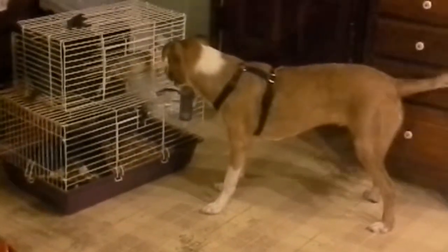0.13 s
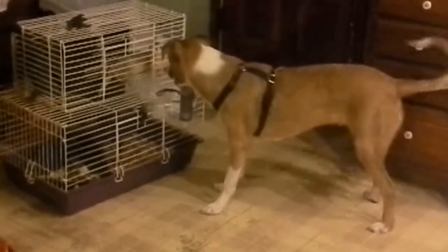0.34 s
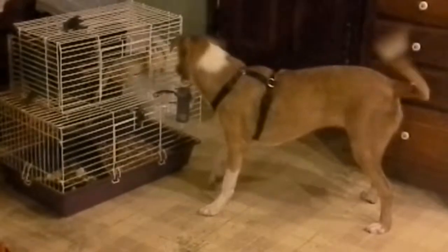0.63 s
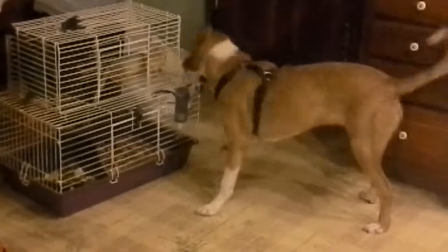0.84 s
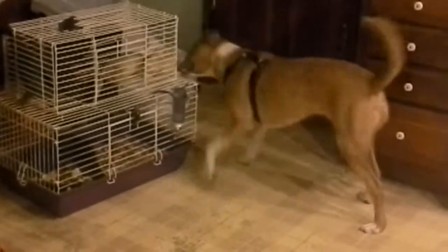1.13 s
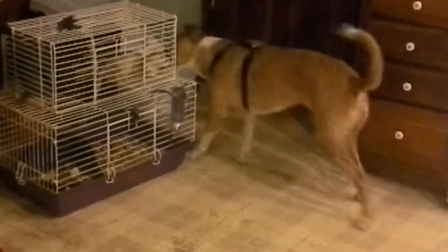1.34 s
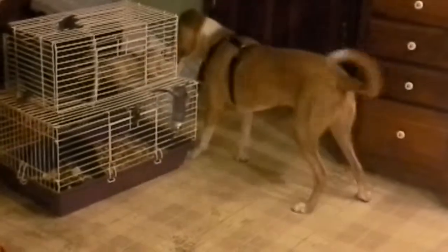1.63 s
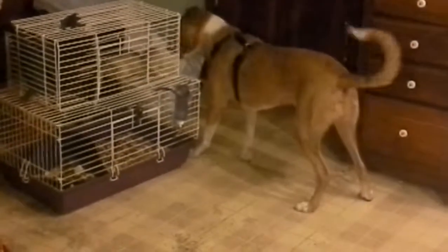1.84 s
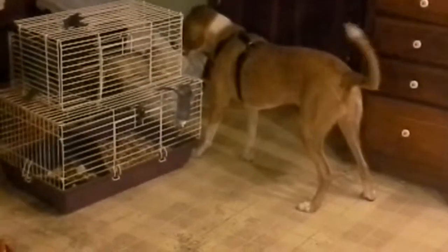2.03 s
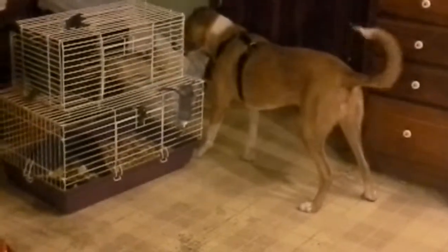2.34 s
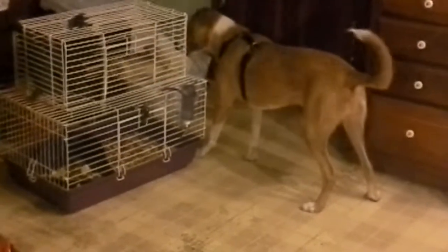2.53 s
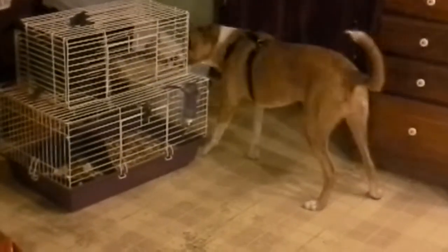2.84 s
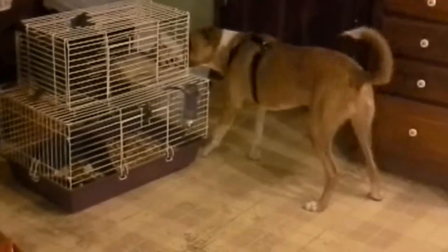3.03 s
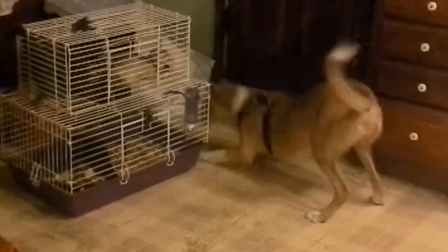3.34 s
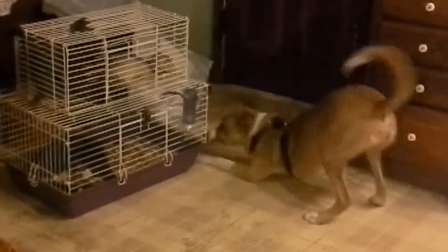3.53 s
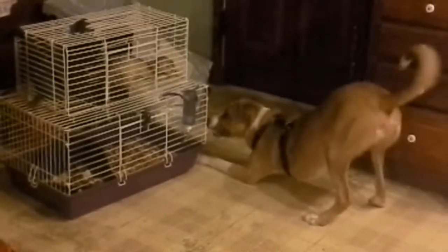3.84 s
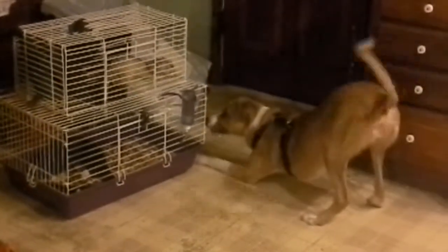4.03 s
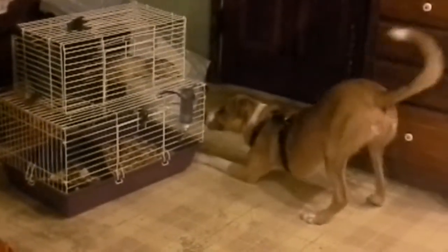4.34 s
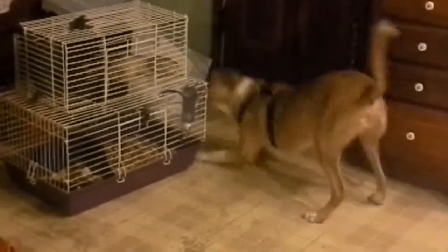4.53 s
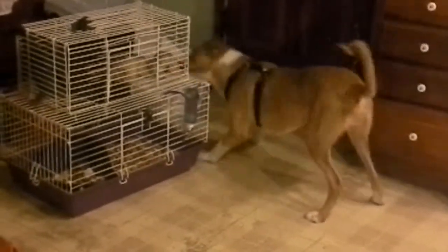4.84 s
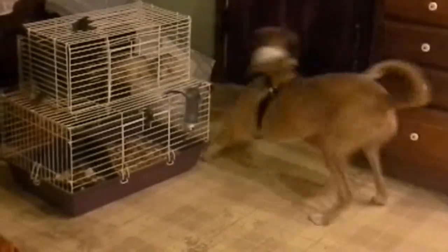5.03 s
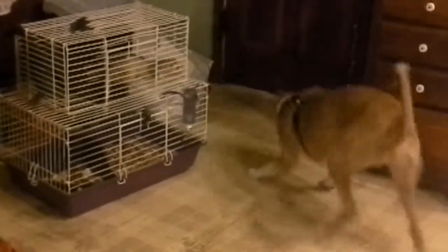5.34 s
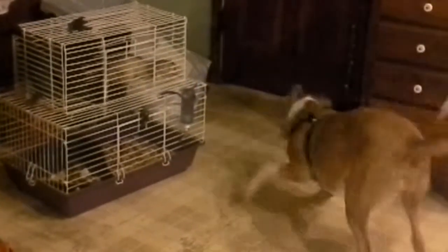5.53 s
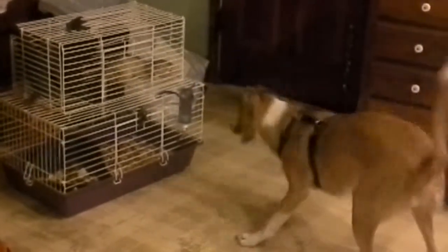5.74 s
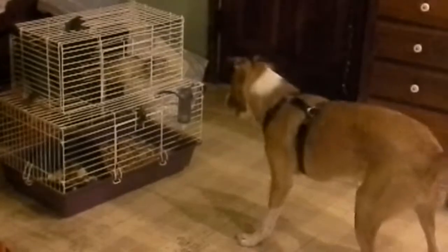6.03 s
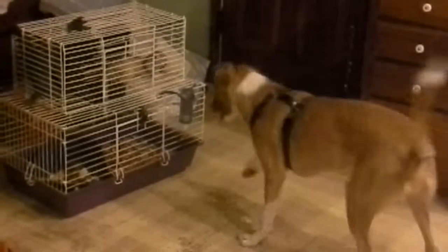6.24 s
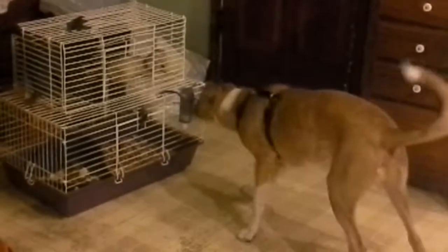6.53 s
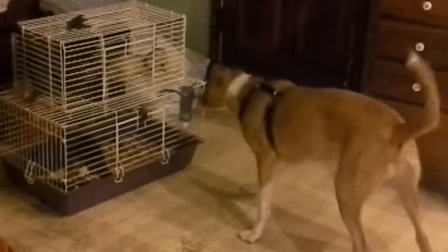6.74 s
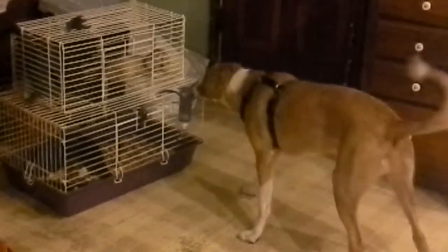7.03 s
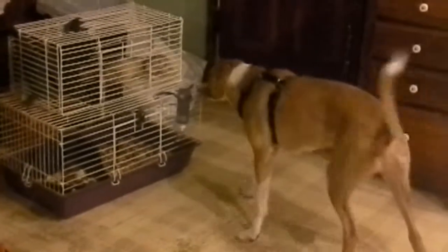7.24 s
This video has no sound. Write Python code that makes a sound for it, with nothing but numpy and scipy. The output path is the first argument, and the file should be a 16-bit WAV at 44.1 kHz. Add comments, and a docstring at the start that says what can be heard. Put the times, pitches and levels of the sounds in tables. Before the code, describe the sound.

A soft steady fan and a very faint mains hum lie under everything in a small, hard-floored, brightly echoing room, heard from nearby. A barely audible paw tap comes at 0.5 seconds. From about 0.95 to 1.6, claws scrape briefly with a thin squeak, paws pad lightly, and the wire cage gives several small dry clinks. It falls quiet, with slight rubbing and a tiny buckle tinkle near 3. At 3.4 to 3.6 the dog's front paws land in a deep double thump, with a sharp metallic clank and soft scuffing. Another lull holds only faint brushing. Between 5.1 and 5.7 comes the loudest cluster: quick hard thumps and bright wire clatter, strongest at 5.3, bars ringing briefly. A claw drags softly at 5.85. A single clink with a muffled thump sounds at 6.45, then light rustling and tiny tinkles around 6.7 before the fan alone remains.

```python
"""A dog pounces and jumps beside a wire pet cage in a small, hard-floored room.
Clusters of noise cracks excite bar resonances for the clinks and chatter, with pings and dry clicks on top.
Paws thump as damped board modes with a deep push; shaped noise makes their scuffs and claw drags.
Wall echoes and decaying noise answer brightly, and a buckle tinkles faintly through resonant peaks.
Behind it, coloured noise makes a soft fan and wavering sines make a mains hum."""
import sys
import numpy as np
from scipy import signal
from scipy.fft import rfft, irfft, next_fast_len
from scipy.io import wavfile
from scipy.ndimage import map_coordinates

SR = 44100
rng = np.random.default_rng(int(sys.argv[2]) if len(sys.argv) > 2 else 0)


def generate_wav(signal):
    """Clip the signal to [-1, 1] and save it as 16-bit WAV at the path in sys.argv[1]."""
    frames = np.transpose(np.atleast_2d(signal))
    scaled = np.clip(frames, -1, 1) * 32767
    pcm = np.round(scaled).astype(np.int16)
    wavfile.write(sys.argv[1], SR, pcm)


N = 326340  # length [samples]
T = np.arange(int(.7 * SR)) / SR  # time axis of one hit [s]

# fan noise colour: (frequency [Hz], relative level [dB per Hz])
FAN_COLOUR = [(25, -27), (50, -6), (90, -9.5), (180, -5.5), (450, -3.5), (680, -8), (820, -5), (915, 0.5),
              (1040, -5.5), (1270, -6), (1550, -13), (2300, -12), (3200, -16), (7500, -20), (14500, -23)]
# fan's place in stereo: (frequency [Hz], left over right [dB])
FAN_LEAN = [(380, 5.5), (700, -7.5), (1300, -7), (2400, 1), (4400, 4), (8000, 0)]
# mains hum partials: (frequency [Hz], level [dB rms])
HUM_PARTIALS = [(60, -76), (120, -77.5), (180, -72), (240, -75), (299, -72), (360, -75.5)]
# paws landing: (time [s], relative level [dB], centre [Hz], deep push over knock [dB])
THUMPS = [(0.463, -54, 376, -21), (1.087, -35.5, 350, -7), (1.11, -38.5, 372, -24),
          (1.272, -48.5, 540, -24), (1.436, -41.5, 282, -20), (3.384, -23, 318, -11.5),
          (3.474, -32.5, 294, -9.5), (3.541, -22, 270, -13), (3.557, -32, 258, -21), (3.622, -43, 262, -25),
          (5.135, -48, 226, -18.5), (5.32, -20, 266, -46.5), (5.335, -16, 350, -28.5),
          (5.417, -30, 365, -22.5), (5.525, -30.5, 263, -31), (5.541, -26, 255, -34),
          (5.711, -29, 238, -28), (6.453, -43, 312, 1.5)]
# floor board modes: (frequency [Hz], relative level [dB], t60 [s])
BOARDS = [(140.5, -1, 0.17), (171.3, 2, 0.16), (231.4, 4, 0.15), (259.6, -1, 0.27), (316, 3, 0.2),
          (361, -5, 0.15), (382.5, -5.5, 0.26), (413, -3.5, 0.12), (452, -3, 0.1)]
# the whole floor flexing: (frequency [Hz], relative level [dB per Hz])
FLOOR_PUSH = [(40, -17.5), (78, -7), (120, -13), (300, -82)]
# strokes of paws and fur on floor and bars: (start [s], swell [s], level [dB], hiss over body [dB])
RUBS = [(.945, 0.077, -53, -4.5), (1.136, 0.069, -48, -1), (2.725, 0.047, -57.5, -11), (2.9, 0.082, -62, 1),
        (3.197, 0.07, -53.5, 3), (3.5, 0.13, -51, -1), (4.48, 0.1, -67, -1), (4.69, .11, -58, 2.5),
        (4.9, 0.2, -51, 2), (5.19, 0.08, -57.5, -5), (5.8, 0.09, -54, -1.5), (6.57, 0.18, -53.5, -0.5)]
# fine hiss of a stroke: (frequency [Hz], relative level [dB per Hz])
RUB_HISS = [(1500, -28.5), (3000, -10), (4800, -12), (6200, -10.5), (7700, -4), (9000, -9), (14500, -19)]
# hollow body of a stroke: (frequency [Hz], relative level [dB per Hz])
RUB_BODY = [(100, -1), (280, 2.5), (470, 6.5), (700, -4), (1250, -1.5), (1800, -6.5), (2500, -3),
            (3600, -15.5), (8000, -37)]
# claws dragging over the floor: (start [s], length [s], level [dB], squeak over scrape [dB])
DRAGS = [(0.951, 0.12, -48.5, -11.5), (1.164, 0.078, -44.5, -6), (5.846, 0.13, -47, -16)]
# scrape resonances: (frequency [Hz], width [Hz], relative level [dB])
CLAW_PEAKS = [(1100, 170, -1.5), (1320, 530, -4), (2200, 200, -4), (2650, 160, -2), (2400, 4100, -14.5)]
# squeak resonance: (frequency [Hz], width [Hz], relative level [dB])
SQUEAK_PEAKS = [(6700, 570, -2)]
# bumps on the wires: (time [s], relative level [dB], relative bar ring [dB], ring centre [Hz],
# brightness [dB per octave], chatter time [s])
CLINKS = [(1.084, -40, -5, 2360, -9.5, 0.0046), (1.0952, -24, -3.5, 2390, 1.5, 0.011),
          (1.215, -38, -0.5, 2300, -5.5, 0.027), (1.438, -24, 2, 2460, 1, 0.003),
          (1.6174, -32, -5.5, 2690, -2, 0.0025), (3.3816, -18, 1, 1980, 1, 0.0038),
          (3.476, -32.5, 3.5, 1870, -4, 0.0047), (4.496, -61.5, 7, 2500, -5, 0.0041),
          (5.146, -38.5, 1, 2470, 0, 0.0012), (5.255, -46, 3, 2380, -22.5, 0.012),
          (5.3168, -14, 3, 2560, -1.4, 0.0095), (5.412, -21.5, -3, 2710, 0, 0.0022),
          (5.5254, -30, -20.5, 2600, -7.5, 0.00077), (5.5321, -19, 0, 2530, 2, .0055),
          (5.7036, -19.7, 3, 2480, -0.5, 0.0037), (6.4526, -22.5, 0, 2670, 0.5, 0.0044)]
# cage bar resonances: (frequency [Hz], width [Hz], relative level [dB])
BARS = [(1910, 59, -6.5), (2213, 68, 2), (2376, 37, 0), (2546, 53, -0.5), (2650, 90, 1.5),
        (2960, 1300, -2.5), (3475, 60, -6.5), (8000, 400, -14)]
# thin modes of the cage frame: frequency [Hz]
FRAME_MODES = [4080, 4880, 5970, 6730, 7120, 8200, 8360, 9100, 11100]
# crack of wire on wire: (frequency [Hz], relative level [dB per Hz])
CRACK_COLOUR = [(80, -72), (220, -8), (750, -11.5), (1300, -7.5), (1900, -1.5), (2800, -0.5), (3700, -1.5),
                (5400, -1), (6800, 3.5), (8200, 4.5), (10200, -1.5), (14500, -6)]
# dry clicks within the clatter, some at a bump, some as sharp echoes just after:
# (time [s], relative level [dB], pitch [Hz])
CLICKS = [(1.11, -5.5, 9000), (1.4393, -23, 2460), (1.4532, -8, 7550), (1.622, -27, 2800),
          (1.639, -14, 7500), (3.399, -26, 2100), (5.5262, -7.5, 7600), (5.532, -14, 2860),
          (5.547, -4, 7600), (5.7087, -19, 2570), (6.4523, -18.5, 2580), (6.471, -5, 6600)]
# light taps of a buckle: (time [s], level [dB])
TINKLES = [(2.972, -62), (6.676, -59.5), (6.729, -52)]
# buckle resonances: (frequency [Hz], width [Hz], relative level [dB])
BUCKLE_PEAKS = [(6100, 400, -1), (7640, 500, 0), (12100, 1800, -2)]
# room decay by band: (frequency [Hz], t60 [s])
ROOM_DECAY = [(100, 0.48), (300, 0.39), (3500, 0.36), (8500, 0.32), (14000, 0.24)]
# first wall echoes: (delay [s], relative strength)
WALLS = [(.0058, 0.45), (.0095, 0.32), (0.0144, 0.4), (0.019, .45), (.029, 0.072)]
# stereo width: (frequency [Hz], left-right likeness [-1 to 1])
LIKENESS = [(130, 0.93), (290, 0.9), (640, 0.28), (1400, 0.45), (2600, -0.19), (5000, 0.019)]
# place of cage and dog in stereo: (frequency [Hz], left over right [dB])
CAGE_LEAN = [(380, 1.5), (700, -5.5), (1300, -8.5), (2400, -0.5), (4400, -0.5), (8100, -16), (15000, -39)]

FAN_DB, FAN_SWING_DB = -58, 0.8
SLAP_DB = -6  # pad slap against the boards' ring
# after each paw the weight settles: a lower thump that grows with the deep push, up to a limit
SETTLE_S, SETTLE_HZ, SETTLE_OVER_PUSH_DB, SETTLE_LIMIT_DB, SETTLE_PUSH_DB = 0.04, 155, 10, -5.5, -15.5
RUB_FADE_DB_PER_S = 86
HARD_DB = -26  # bumps above this count as hard: they get a light first touch and a rustle
TOUCH_S, TOUCH_DB = .008, -24  # lead time, and level against the bump
RUSTLE_DB, RUSTLE_HISS_DB, RUSTLE_SWELL_S, RUSTLE_FADE_DB_PER_S = -30.5, -18, 0.13, 62
PING_HZ, PING_OCTAVES, PING_WAIT_S, PING_T60_S = 2593, .8, .022, 0.095  # centre, spread, mean wait, decay
PING_DB = -17.02  # against the bump's listed level
CLICK_CYCLES = 2.3  # cycles to fall to 1/e
LOW_HZ, TOP_HZ = 47.6, 14700  # band limits


def amp(db):
    """Decibels to gain."""
    return 10 ** (np.asarray(db) / 20)


def unit(x):
    """Scale each channel to rms 1."""
    return x / np.sqrt(np.mean(x ** 2, axis=-1, keepdims=True) + 1e-20)


def burst(x):
    """Scale a hit to the energy of a twentieth of a second at rms 1."""
    return unit(x) * np.sqrt(SR / 20 / x.shape[-1])


def along(points, hz):
    """Read (Hz, value) points on a log frequency axis."""
    f, v = np.transpose(points)
    return np.interp(np.log(hz + 1), np.log(f + 1), v)


def wobble(rate):
    """A smooth random curve, rate knots a second."""
    knots = rng.standard_normal(int(N * rate / SR) + 4)
    return map_coordinates(knots, [np.arange(N) * rate / SR])


def filtered(x, response):
    """Zero-phase colouring by a gain function of frequency."""
    n = x.shape[-1]
    m = next_fast_len(n + SR // 10, True)
    return irfft(rfft(x, m) * response(np.fft.rfftfreq(m, 1 / SR)), m)[..., :n]


def causal(x, level, size=2048):
    """Minimum-phase colouring by a dB function of frequency: nothing sounds before the blow."""
    cepstrum = irfft(np.log(amp(level(np.fft.rfftfreq(size, 1 / SR)))))
    fold = 1 + np.sign(size // 2 - np.arange(size))
    fold[0] = 1
    impulse = irfft(np.exp(rfft(cepstrum * fold)))
    return signal.fftconvolve(x, impulse[None], axes=1)[:, :x.shape[1]]


def ports(pair, lean):
    """Turn two unrelated signals into left and right, with likeness and lean set by band."""
    turn = lambda hz: np.arccos(np.clip(along(LIKENESS, hz), -1, 1)) / 2
    mid, side = filtered(pair, lambda hz: np.array([np.cos(turn(hz)), np.sin(turn(hz))]))
    tilt = lambda hz: np.arctan(amp(along(lean, hz)))
    gains = lambda hz: np.sqrt(2) * np.array([np.sin(tilt(hz)), np.cos(tilt(hz))])
    return filtered(np.array([mid + side, mid - side]), gains)


def rush(spectrum):
    """A pair of coloured noises of rms 1."""
    return unit(filtered(rng.standard_normal((2, N)), lambda hz: amp(along(spectrum, hz))))


def peaks_db(peaks, hz):
    """Level over frequency of a set of resonances."""
    power = sum(amp(db) ** 2 / (1 + ((hz - f) / (width / 2)) ** 2) ** 2 for f, width, db in peaks)
    return 10 * np.log10(power + 1e-9)


def add(track, s, x):
    """Mix x in at time s."""
    part = track[:, round(s * SR):][:, :x.shape[1]]
    part += x[:, :part.shape[1]]


def tail():
    """A fresh pair of noise room tails, each band dying at its own speed."""
    hz, t, bands = signal.stft(rng.standard_normal((2, len(T))), SR, nperseg=256)
    fade = amp(-60 * t / along(ROOM_DECAY, hz)[:, None])
    return burst(signal.istft(bands * fade, SR, nperseg=256)[1][:, :len(T)])


def in_room(power, wet_db, walls_db):
    """White cracks of that power, their nearest wall echoes, and the tail that they build up."""
    echoes = sum(strength ** 2 * np.pad(power, (int(delay * SR), 0))[:len(T)] for delay, strength in WALLS)
    early = power + amp(walls_db) ** 2 * echoes
    build = np.cumsum(early) / early.sum()
    direct = burst(np.sqrt(early) * rng.standard_normal((2, len(T))))
    return direct + amp(wet_db) * burst(tail() * np.sqrt(build))


def fan():
    """A fan's rush: coloured air noise whose level drifts slightly."""
    return amp(FAN_DB + FAN_SWING_DB * wobble(5.7)) * ports(rush(FAN_COLOUR), FAN_LEAN)


def hum():
    """Mains hum: sine partials, each a little unsteady in level and phase."""
    t = np.arange(N) / SR
    out = np.zeros(N)
    for hz, db in HUM_PARTIALS:
        level = np.sqrt(2) * amp(db + 0.85 * wobble(3.0))  # rms to peak
        out += level * np.sin(2 * np.pi * (hz * t + rng.random()) + 0.5 * wobble(1.7))
    return out


def landings():
    """Every paw, and the weight that settles after it."""
    settles = [(s + SETTLE_S, db + min(deep_db + SETTLE_OVER_PUSH_DB, SETTLE_LIMIT_DB),
                SETTLE_HZ, SETTLE_PUSH_DB) for s, db, _, deep_db in THUMPS]
    return THUMPS + settles


def ring(modes, scatter_db):
    """A pair of damped mode sums, struck at new strengths."""
    out = np.zeros((2, len(T)))
    for hz, db, t60 in modes:
        level = amp(db + scatter_db * rng.standard_normal() - 60 * T / t60)
        out += level * np.sin(2 * np.pi * (hz * T + rng.random((2, 1))))
    return out


def paws():
    """A soft landing slaps, rings the boards near its centre pitch and pushes the whole floor."""
    out = np.zeros((2, N))
    # boards radiate little below their lowest mode
    radiation = signal.butter(6, 135, "high", fs=SR, output="sos")
    for s, db, centre_hz, deep_db in landings():
        pad_db = lambda hz: -12 * np.log2((hz + 1) / centre_hz) ** 2
        boards = ring([(hz, level + pad_db(hz), t60) for hz, level, t60 in BOARDS], scatter_db=3.0)
        boom = causal(tail(), lambda hz: np.maximum(pad_db(hz), -80))
        # the pad itself, heard dry
        slap = np.outer([1, 0], np.sin(2 * np.pi * centre_hz * T) * np.exp(-T / 0.0026))
        blow = burst(boards) + amp(-5.5) * burst(boom) + amp(SLAP_DB) * burst(slap)
        knock = signal.sosfilt(radiation, blow * (1 - np.exp(-T / 0.0017)))  # soft onset
        push_shape = np.exp(-T / 0.14) * (1 - np.exp(-T / 0.012))
        push = causal(tail() * push_shape, lambda hz: along(FLOOR_PUSH, hz))
        add(out, s, amp(db - 5.5) * (burst(knock) + amp(deep_db) * burst(push)))
    return out


def stroke(start, swell, fade_db_per_s):
    """Gain over time of a movement that swells to 1, then dies away."""
    t = np.arange(N) / SR - start
    rise = np.sin(np.pi / 2 * np.clip(t / swell, 0, 1)) ** 2
    return rise * amp(-fade_db_per_s * np.maximum(t - swell, 0))


def scuffs():
    """Strokes, and the cage's rustle after hard bumps: a fine, catching hiss over a hollow body."""
    moves = [(amp(db) * stroke(s, swell, RUB_FADE_DB_PER_S), hiss_db) for s, swell, db, hiss_db in RUBS]
    for s, db, *_ in CLINKS:
        if db > HARD_DB:
            rustle = amp(db + RUSTLE_DB) * stroke(s, RUSTLE_SWELL_S, RUSTLE_FADE_DB_PER_S)
            moves.append((rustle, RUSTLE_HISS_DB))
    # overlapping moves add in power
    body = np.sqrt(sum(gain ** 2 for gain, _ in moves))
    hiss = np.sqrt(sum((gain * amp(hiss_db)) ** 2 for gain, hiss_db in moves))
    grip = amp(.9 * wobble(30) + 1.2 * wobble(400))
    return grip * (hiss * rush(RUB_HISS) + body * rush(RUB_BODY))


def drags():
    """A claw slides and catches, swelling early in the stroke, with a thin squeak on top."""
    scrape, squeak = np.zeros((2, N))
    for s, length, db, squeak_db in DRAGS:
        progress = np.clip((np.arange(N) / SR - s) / length, 0, 1)
        level = amp(db) * np.abs(np.sin(np.pi * progress ** 0.63))
        scrape += level
        squeak += level * amp(squeak_db)
    rubbed = lambda peaks: unit(filtered(rng.standard_normal((2, N)), lambda hz: amp(peaks_db(peaks, hz))))
    catch = amp(1.2 * wobble(340))
    return catch * (scrape * rubbed(CLAW_PEAKS) + squeak * rubbed(SQUEAK_PEAKS))


def contacts():
    """Every bump, and the light first touch that comes just before each hard one."""
    touches = [(s - TOUCH_S, db + TOUCH_DB, *colour) for s, db, *colour in CLINKS if db > HARD_DB]
    return CLINKS + touches


def chatter(life, rebound, crack_s, count=14):
    """Power over time of a contact and its fading rebounds, each a very short crack; sums to 1."""
    when = (np.arange(count) + rng.random(count)) * 3 * life / count
    strengths = rebound * rng.exponential(size=count) * np.exp(-when / life)
    hits = np.bincount((when * SR).astype(int), strengths, len(T))[:len(T)]
    hits[0] += 0.0031 / life  # a short, clean knock puts more into its first contact
    power = signal.lfilter([1], [1, -np.exp(-1 / (crack_s * SR))], hits)
    return power / power.sum()


def ripple(spacing_hz):
    """The crowd of lesser wire modes: a random rise and fall along frequency, of spread 1."""
    knots = rng.standard_normal(1024)
    return lambda hz: map_coordinates(knots, [hz / spacing_hz], mode="mirror")


def frame_db(hz, width_hz, lift_db):
    """The frame's thin modes, the same for every bump."""
    return lift_db * sum(1 / (1 + ((hz - f) / (width_hz / 2)) ** 2) for f in FRAME_MODES)


def bars_db(hz, centre_hz, spread_db):
    """The bars' resonances; those near the struck bar's pitch answer most."""
    weight = lambda f: spread_db * (np.exp(-(np.log2(f / centre_hz) / 0.27) ** 2) - 1)
    power = sum(amp(db + weight(f)) ** 2 / (1 + ((hz - f) / (width / 2)) ** 2) for f, width, db in BARS)
    return 10 * np.log10(power * (hz / (hz + 1000)) ** 4 + 1e-9)  # thinned towards the bass


def pings(count=20):
    """Neighbouring wires shaken by a bump: each starts a moment later and rings at its own pitch."""
    wait, size = rng.exponential(size=(2, count, 1))
    hz = np.minimum(PING_HZ * 2 ** (PING_OCTAVES * rng.standard_normal((count, 1))), TOP_HZ)
    t = np.maximum(T[:len(T) // 2] - PING_WAIT_S * wait, 0)
    strength = np.sqrt(size) * np.exp(-wait / 2)  # later wires are weaker
    wires = strength * amp(-60 * t / PING_T60_S) * np.sin(2 * np.pi * hz * t)
    return burst(rng.standard_normal((2, count)) @ wires)


def cage():
    """Each bump makes loose wires chatter: sharp cracks that set the bars ringing."""
    out = np.zeros((2, N))
    for s, db, ring_db, centre_hz, bright_db, life in contacts():
        spot = ripple(spacing_hz=117.56)  # each contact point favours other modes
        modes_db = lambda hz: frame_db(hz, width_hz=55, lift_db=4.5) + 2.6 * spot(hz)
        tilt_db = lambda hz: bright_db * np.log2(np.maximum(hz, 1000) / 5000)  # sets the contact's brightness
        crack_db = lambda hz: along(CRACK_COLOUR, hz) + modes_db(hz) + tilt_db(hz)
        power = chatter(life, rebound=0.37, crack_s=0.00049)
        bite = 1 - 0.69 * np.exp(-T / 0.002)  # the bar bends first, then the contact hardens
        crack = causal(in_room(power, wet_db=5.5, walls_db=3.0) * bite, crack_db)
        bars = causal(in_room(power, wet_db=-3.0, walls_db=-13.5),
                      lambda hz: bars_db(hz, centre_hz, spread_db=21.0))
        add(out, s, amp(db - 4.0) * (burst(crack) + amp(ring_db - 7.5) * burst(bars)))
        add(out, s, amp(db + PING_DB) * pings())
    return out


def clicks():
    """One dry click of a few cycles at each listed time: a sine that dies away at once."""
    out = np.zeros((2, N))
    for s, db, hz in CLICKS:
        click = np.sin(2 * np.pi * hz * T) * np.exp(-hz * T / CLICK_CYCLES)
        add(out, s, amp(db) * np.outer([1, 0], click))
    return out


def buckle():
    """A small piece of metal tinkles: light chattering taps excite its high resonances."""
    out = np.zeros((2, N))
    for s, db in TINKLES:
        taps = in_room(chatter(life=.009, rebound=.2, crack_s=0.00054), wet_db=-13.0, walls_db=8)
        add(out, s, amp(db) * burst(causal(taps, lambda hz: peaks_db(BUCKLE_PEAKS, hz))))
    return out


def scene():
    """Dog and cage share one stereo lean, over the fan and hum."""
    action = paws() + scuffs() + drags() + cage() + clicks() + buckle()
    return ports(action, CAGE_LEAN) + fan() + hum()


def record(dry):
    """Shed the deepest bass and keep nothing above the band limit."""
    thin = filtered(dry, lambda hz: 1 / np.sqrt(1 + (LOW_HZ / (hz + 1)) ** 10))
    return filtered(thin, lambda hz: np.clip((TOP_HZ - hz) / 200 + .5, 0, 1))


dry = scene()
out = record(dry)
generate_wav(out)
```